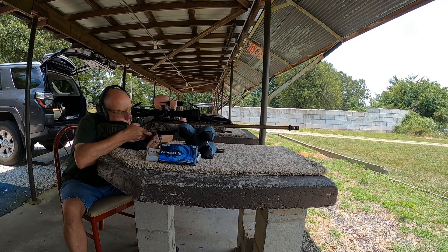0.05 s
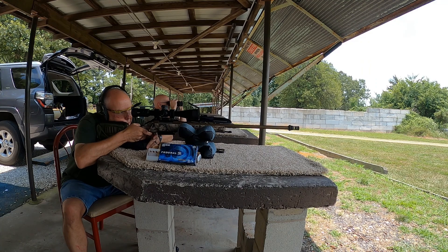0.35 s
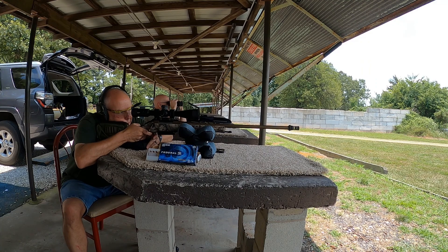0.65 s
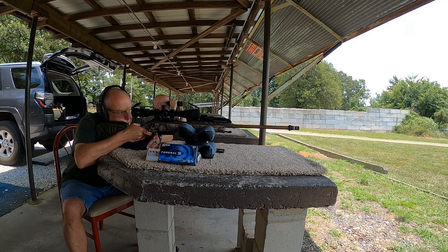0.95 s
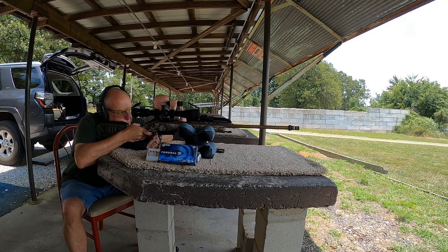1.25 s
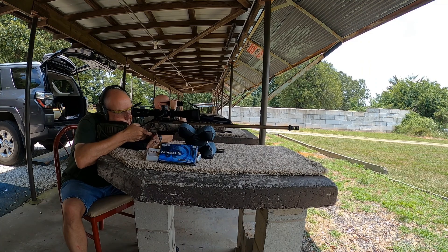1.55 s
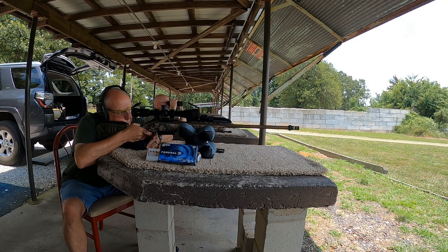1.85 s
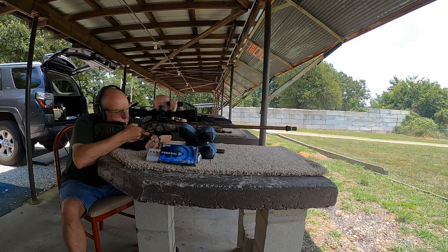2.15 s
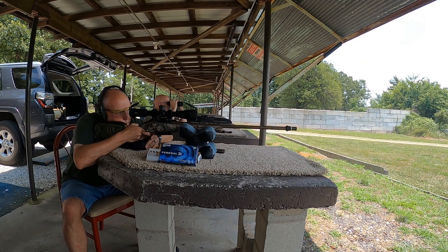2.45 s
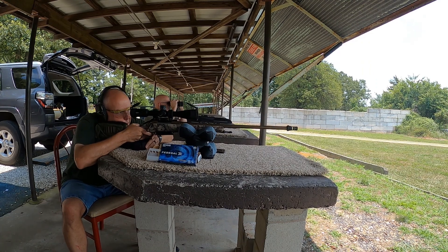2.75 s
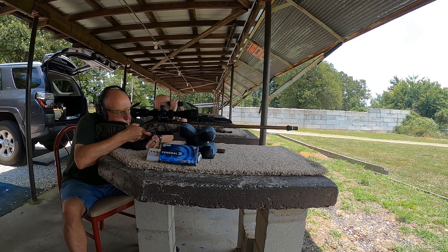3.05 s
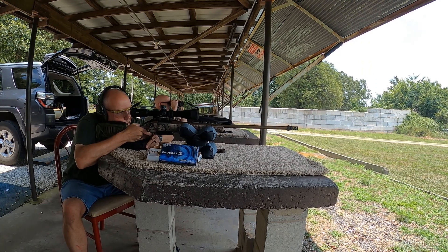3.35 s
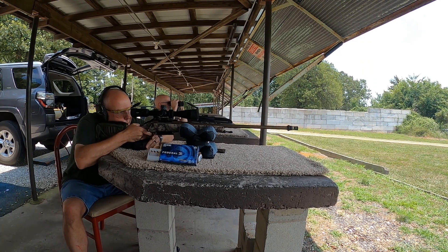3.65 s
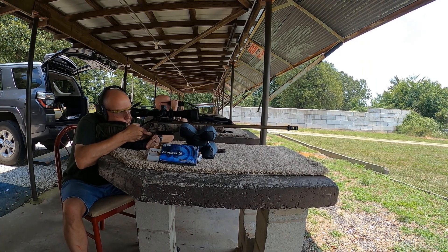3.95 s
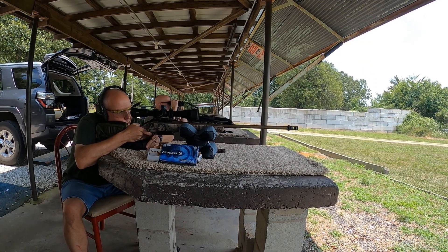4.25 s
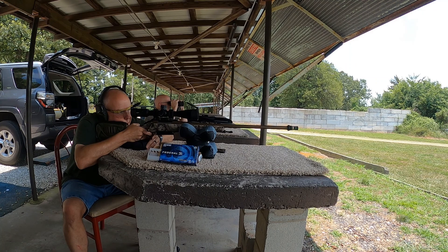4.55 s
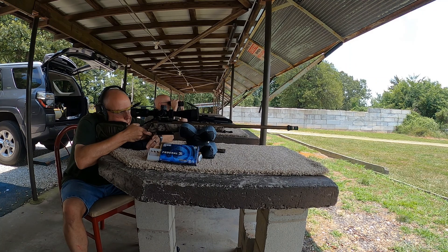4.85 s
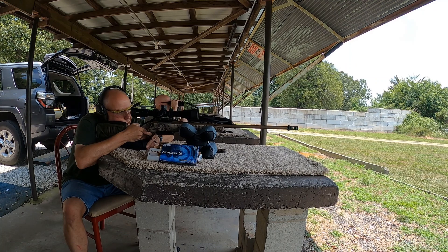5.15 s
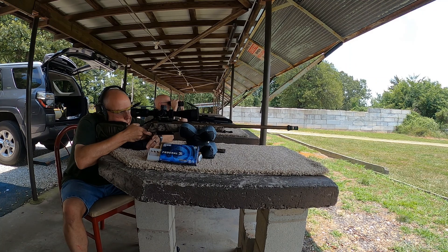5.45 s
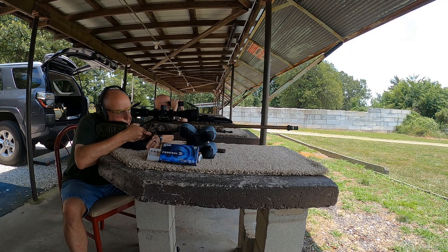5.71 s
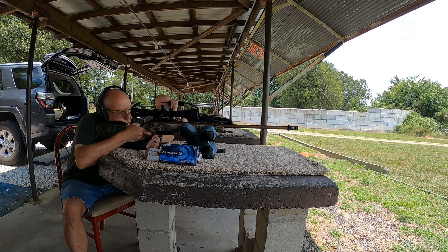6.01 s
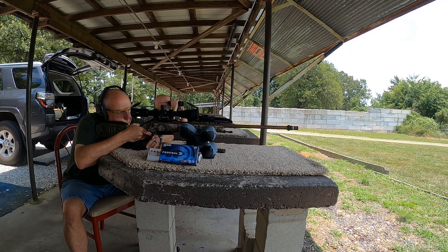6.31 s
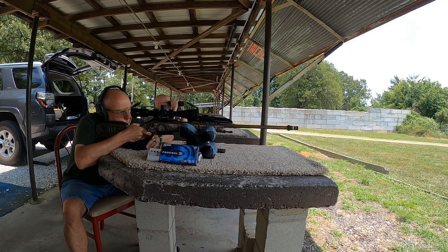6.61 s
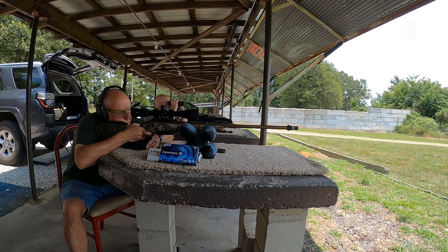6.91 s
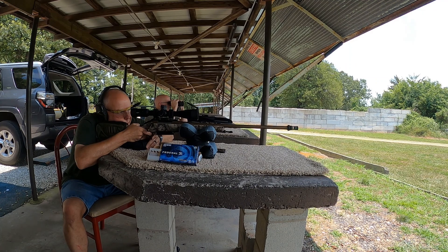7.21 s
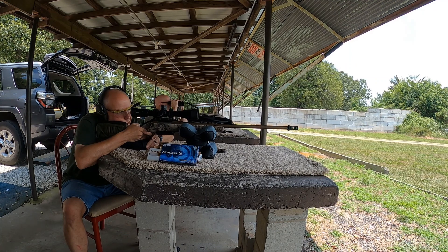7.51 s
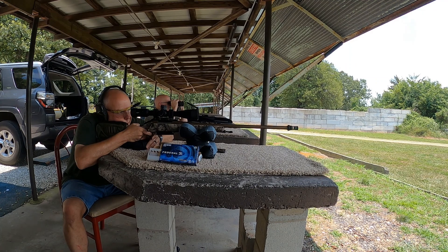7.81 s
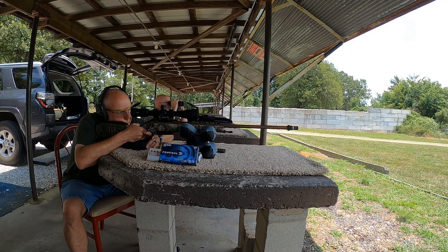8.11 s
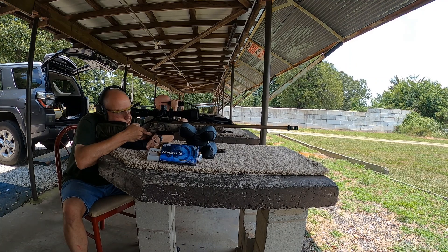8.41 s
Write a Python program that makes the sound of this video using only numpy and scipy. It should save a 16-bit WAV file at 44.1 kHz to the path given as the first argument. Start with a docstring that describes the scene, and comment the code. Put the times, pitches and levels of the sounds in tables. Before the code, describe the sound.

Rifle shots echo across a covered outdoor range, with one much louder, deeper shot close by that briefly muffles the rest.

```python
"""A covered outdoor rifle range, heard in mono from a camera microphone under the metal roof. Some lanes
away a rifle fires steadily: a dull thump, a bright rush scattered by the rafters, then a long roll from
the woods. Metal clicks at the benches, and a brief hollow growl swells into one shot at the nearest bench.
That shot overloads the camera, whose limiter ducks everything and takes about four seconds to recover.
Towards the end a light gust rumbles on the microphone."""
import sys
import numpy as np
from scipy import signal
from scipy.fft import rfft, irfft, next_fast_len
from scipy.io import wavfile

SR = 44100
rng = np.random.default_rng(int(sys.argv[2]) if len(sys.argv) > 2 else 0)


def transcribe(u):
    """Save the signal u as a 16-bit wav file named by the first command-line argument.

    u: samples, shape (n,) or (channels, n), limited to [-1, 1]; the rate is SR.
    q: integer samples, one column per channel.
    """
    v = np.clip(np.atleast_2d(u).T, -1, 1)
    q = np.round(v * 32767).astype(np.int16)
    wavfile.write(sys.argv[1], SR, q)


N = 377937

# Levels are relative, ahead of the limiter; spectra give the level per hertz.
# shots some lanes away: start_s, level_db, thump_db, steel_ring_db
LANE_SHOT_TIMES = [(-1.2, -3, 0, 0), (.019, 0, 1, -5), (1.275, .8, 0, 3), (3.501, -2.1, -1, 6.5),
                   (4.478, -.4, -2.5, 2), (5.640, -1, -2, -3), (6.805, .6, -.5, -4), (7.634, .2, -.5, -5)]
# muzzle wave to the microphone, direct, off the ground, off walls: delay_s, peak_db, low_hz, high_hz
MUZZLE_PATHS = [(.0002, -9, 520, 1100), (.002, -5.3, 340, 580), (.0885, -19, 300, 540),
                (.0915, -19, 300, 580), (.1345, -18.5, 140, 420), (.238, -28, 140, 450),
                (.599, -24, 700, 1400)]
# low modes of the shooting bay: pitch_hz, level_db, t60_s
BAY_MODES = [(335, -16, .12), (75, -38, .09)]
# high modes of the shelter's steel: pitch_hz, width_hz, level_db, t60_s
STEEL_MODES = [(4566, 7, -39.5, 1.35), (4640, 80, -42, 1.0), (7474, 4, -49.5, .8), (7540, 120, -57, .7)]
# scatter along the roof: frequency_hz, level_db
ROOF_SPECTRUM = [(29, -55), (50, -33), (138, -20), (179, -11), (237, -17), (293, -5.5), (492, -7),
                 (847, -.5), (1640, -9), (1840, -5), (2630, -9), (3250, -6), (7580, -25), (10600, -41),
                 (14000, -62)]
# scatter off nearby posts, whole shelter, rafters, far end of the roof: delay_s, level_db, rise_s, t60_s
ROOF_ECHOES = [(0, -26, .002, .15), (0, -26.5, .004, 3.5), (.022, -20, .065, 1.1), (.13, -21.2, .095, .22)]
# dull roll off ground and woods: frequency_hz, level_db
WOODS_SPECTRUM = [(40, -26), (75, -13), (110, -15), (170, -6.5), (240, -16), (400, -8), (520, 1), (640, -1),
                  (800, 1), (1050, -1), (1400, -12), (2300, -16), (4500, -30), (12000, -75)]
# roll from open ground, side berm, tree line, far woods: delay_s, level_db, rise_s, t60_s
WOODS_ECHOES = [(.001, -31, .003, 5.4), (.035, -23.5, .04, .2), (.57, -38, .03, 3.5), (.75, -38, .38, 2.2)]

# open air, and the breeze on the microphone: frequency_hz, level_db
AIR_SPECTRUM = [(20, -6), (150, 0), (900, -6), (3000, -22), (6000, -40), (13000, -62)]
BREEZE_SPECTRUM = [(15, -15), (40, -2), (75, 0), (150, -10), (500, -40), (3000, -90)]
# metal handled at the benches: start_s, level_db, low_hz, high_hz, t60_s
BENCH_CLICKS = [(2.0897, -26, 1800, 8000, .008), (2.095, -18, 600, 6000, .007),
                (3.002, -37, 3000, 6500, .15), (3.26, -38, 3000, 6500, .15), (3.3795, -23, 2800, 5400, .07),
                (3.398, -25, 2300, 3600, .09), (6.691, -48, 4750, 4950, .09)]
# hollow resonances of the growl: pitch_hz, width_hz, level_db
GROWL_MODES = [(237, 14, 0), (700, 18, -3), (860, 50, -11)]
# rasp on the growl: frequency_hz, level_db
RASP_SPECTRUM = [(60, -16), (800, 0), (1600, -8), (5000, -16), (11000, -22), (15000, -40)]

# the near shot's crack, its boom and its return from far down the field: frequency_hz, level_db
CRACK_SPECTRUM = [(40, -34), (120, -16), (300, 0), (500, 3), (850, 3.5), (1150, 2), (1500, -4.5),
                  (2200, -3.5), (3200, -8), (4700, -11), (6500, -20), (10000, -32), (14000, -54)]
BOOM_SPECTRUM = [(40, -44), (100, -32), (130, -14), (146, 0), (175, -2), (225, -5), (265, -16), (305, -4.5),
                 (335, -4.5), (420, -16), (900, -19), (1600, -42), (4000, -100)]
FIELD_SPECTRUM = [(30, -12), (80, -9), (200, -3), (400, -5), (750, 0), (1400, -1), (2300, -3), (4500, -14),
                  (6400, -26), (12000, -62)]
# the crack under the roof, then back from the berms: delay_s, level_db, rise_s, t60_s
CRACK_ECHOES = [(.0006, -11.6, .001, .57), (.14, -35, .23, .85)]
# the blast, its return from the berms, a lingering rumble: delay_s, level_db, rise_s, t60_s
BOOM_ECHOES = [(.001, -16, .008, 1.0), (.24, -38.5, .18, .55), (.3, -61, .3, 5.5)]
# slow returns from the end of the field and the trees behind: delay_s, level_db, rise_s, t60_s
FIELD_ECHOES = [(.55, -52, .22, 3), (.82, -52.5, .3, 1.9)]
# the space under the roof, rung by the near shot: pitch_hz, level_db, t60_s
SHELTER_MODES = [(146, -9, .75), (196, -17, .6), (334, -17, .6), (388, -23, .6)]


def undb(db):
    """Decibels to gain."""
    return np.exp(np.asarray(db) * np.log(10) / 20)


def unit(x):
    """Scale to rms 1."""
    return x / x.std()


def add(out, start_s, x):
    """Mix x into out from start_s on."""
    start = int(round(start_s * SR))
    lo, hi = max(start, 0), min(start + len(x), len(out))
    out[lo:hi] += x[lo - start:max(hi, lo) - start]


def colour(x, spectrum):
    """Shape noise to a spectrum, at rms 1."""
    hz, db = np.transpose(spectrum)
    size = next_fast_len(len(x), True)
    bins_hz = np.maximum(np.fft.rfftfreq(size, 1 / SR), 1)
    gain = undb(np.interp(np.log(bins_hz), np.log(hz), db))
    return unit(irfft(rfft(x, size) * gain, size)[:len(x)])


def lowpass(x, hz, order):
    """Causal low-pass."""
    return signal.sosfilt(signal.butter(order, hz, fs=SR, output="sos"), x + 1e-18)


def band(x, low_hz, high_hz):
    """Causal band-pass, gentle below and steep above."""
    low_cut = signal.butter(2, low_hz, "high", fs=SR, output="sos")
    return lowpass(signal.sosfilt(low_cut, x), high_hz, order=5)


def fade(t60, size):
    """Exponential decay, 60 dB in t60 seconds."""
    return np.exp(-np.log(1000) * np.arange(size) / SR / t60)


def swell(size, start_s, rise_s, t60, hold_s=0):
    """Envelope with peak 1: a rounded rise, a hold, an exponential release."""
    t = np.arange(size) / SR - start_s
    release = np.clip((t - rise_s - hold_s) / t60, 0, 10)
    return np.sin(np.pi / 2 * np.clip(t / rise_s, 0, 1)) * np.exp(-np.log(1000) * release)


def ringing(modes, size):
    """Struck modes, each a dying sine."""
    t = np.arange(size) / SR
    return sum(undb(db) * np.sin(2 * np.pi * hz * t) * fade(t60, size) for hz, db, t60 in modes)


def thump(size, low_hz, high_hz):
    """A muzzle wave rounded by its path to the microphone, peak 1."""
    wave = band(signal.unit_impulse(size), low_hz, high_hz)
    return wave / np.abs(wave).max()


def reflections(size, clump_db, clump_hz):
    """Countless small echoes that arrive in clumps."""
    position = np.arange(size) / SR * clump_hz
    clumps = np.interp(position, np.arange(size), rng.standard_normal(size))
    return rng.standard_normal(size) * undb(clump_db * clumps)


def echoes(waves, size):
    """Envelope of overlapping waves of echoes; their powers add."""
    power = sum((undb(db) * swell(size, delay_s, rise_s, t60)) ** 2 for delay_s, db, rise_s, t60 in waves)
    return np.sqrt(power)


def wavering(hz, width_hz, size):
    """A tone widened by a wandering phase, peak 1."""
    drift = np.cumsum(rng.standard_normal(size)) * np.sqrt(2 * np.pi * width_hz / SR)
    return np.sin(2 * np.pi * hz * np.arange(size) / SR + drift)


def through_air(x, db_per_khz_s, neutral_s):
    """Air takes treble with distance: echoes are brighter before neutral_s and duller after it."""
    hz, t, spectra = signal.stft(x, SR, nperseg=512)
    loss_db = np.outer(hz / 1000, t - neutral_s) * db_per_khz_s
    return signal.istft(spectra * undb(-loss_db), SR)[1][:len(x)]


def lane_rifle(shared_power=.7, shadow_s=.03, shadow_hz=4600):
    """Some lanes away: every shot takes the same paths; moving air changes part of the fine scatter."""
    out, size = np.zeros(N), 2 * SR
    t = np.arange(size) / SR
    direct = lowpass(ringing(BAY_MODES, size), 1500, order=2)
    for delay_s, db, low_hz, high_hz in MUZZLE_PATHS:
        add(direct, delay_s, undb(db) * thump(SR // 10, low_hz, high_hz))
    rafters = reflections(size, clump_db=2.2, clump_hz=700)
    trees = reflections(size, clump_db=2.4, clump_hz=55)
    shared = np.sqrt(shared_power) * np.array([rafters, trees])
    rush, roll = echoes(ROOF_ECHOES, size), echoes(WOODS_ECHOES, size)
    # the steel gathers its ring while the wave runs along the roof
    steel = sum(undb(db) * wavering(hz, width_hz, size) * swell(size, start_s=.01, rise_s=.16, t60=t60)
                for hz, width_hz, db, t60 in STEEL_MODES)
    # the first echoes bend round posts and benches and arrive dull
    shadow = np.exp(-(t / shadow_s) ** 4)
    for start_s, db, thump_db, ring_db in LANE_SHOT_TIMES:
        near, far = shared + np.sqrt(1 - shared_power) * rng.standard_normal((2, size))
        roof = through_air(colour(near, ROOF_SPECTRUM), db_per_khz_s=3.7, neutral_s=.14) * rush
        roof = lowpass(roof * np.sqrt(shadow), shadow_hz, order=4) + roof * np.sqrt(1 - shadow)
        woods = colour(far, WOODS_SPECTRUM) * roll
        add(out, start_s, undb(db) * (undb(thump_db) * direct + undb(ring_db) * steel + roof + woods))
    return out


def air_and_breeze(air_db=-54, calm_db=-64, gust_db=-51.5):
    """Quiet open air all round, and a breeze that rumbles on the microphone with one late gust."""
    air = colour(rng.standard_normal(N), AIR_SPECTRUM)
    breeze = colour(reflections(N, clump_db=3, clump_hz=8), BREEZE_SPECTRUM)
    gust = swell(N, start_s=7.5, rise_s=.8, t60=6)
    return undb(air_db) * air + breeze * (undb(calm_db) + undb(gust_db) * gust)


def bench_clicks():
    """At the benches: short bright ticks of handled metal."""
    out, size = np.zeros(N), SR // 2
    for start_s, db, low_hz, high_hz, t60 in BENCH_CLICKS:
        decay = fade(t60, size)
        passband = signal.butter(3, [low_hz, high_hz], "band", fs=SR, output="sos")
        tick = signal.sosfilt(passband, rng.standard_normal(size) * decay + 1e-18)
        add(out, start_s, undb(db) * unit(tick) * decay.std())
    return out


def growl(gain_db=-6.8, rasp_db=-15):
    """Three hollow resonances swell with a rasp on top and die as the near shot arrives."""
    rasp = colour(rng.standard_normal(N), RASP_SPECTRUM)
    hollow = sum(undb(db) * wavering(hz, width_hz, N) for hz, width_hz, db in GROWL_MODES)
    envelope = swell(N, start_s=2.097, rise_s=.024, t60=.015, hold_s=.008)
    return (hollow + undb(rasp_db) * rasp) * undb(gain_db) * envelope


def near_rifle(start_s=2.1326, gain_db=30.5, shock_s=.00038, shock_hz=5000, bench_s=.00045, build_s=.12):
    """At the nearest bench: a shock wave, its crack in the rafters, the boom, the field's far return."""
    out, size = np.zeros(N), 4 * SR
    crack = colour(reflections(size, clump_db=2.2, clump_hz=350), CRACK_SPECTRUM)
    shot = through_air(crack, db_per_khz_s=1.6, neutral_s=.09) * echoes(CRACK_ECHOES, size)
    shot += colour(rng.standard_normal(size), BOOM_SPECTRUM) * echoes(BOOM_ECHOES, size)
    field = colour(reflections(size, clump_db=1.5, clump_hz=90), FIELD_SPECTRUM)
    shot += field * echoes(FIELD_ECHOES, size)
    shot += ringing(SHELTER_MODES, size) * (1 - fade(build_s, size))
    # an N-shaped pressure jump, at once repeated by the bench top and the gear on it
    t = np.arange(SR // 100) / SR
    shock = lowpass((1 - 2 * t / shock_s) * (t < shock_s), shock_hz, order=3)
    add(shot, 0, undb(6) * shock)
    add(shot, bench_s, undb(5) * shock)
    add(shot, 2 * bench_s, undb(5) * shock / 2)
    # the slower push of the gas follows, and later a dull slap off a wall
    push = thump(SR // 10, low_hz=330, high_hz=900)
    slap = band(thump(SR // 10, low_hz=160, high_hz=260), low_hz=150, high_hz=400)
    add(shot, .001, undb(-4) * push)
    add(shot, .141, undb(-10) * slap)
    add(out, start_s, undb(gain_db) * shot)
    return out


def scene():
    """Under the roof, both microphone ports hear the same sound."""
    mono = lane_rifle() + near_rifle() + growl() + bench_clicks() + air_and_breeze()
    return np.array([mono, mono])


def record(dry, ceiling_db=3.2, release_db_per_s=8.3, hiss_db=-100,
           low_cut_hz=42, soft_top_hz=13200, top_hz=14000):
    """The camera's limiter ducks at once and recovers slowly; the highest peaks still clip."""
    recovery_db = release_db_per_s * np.arange(N) / SR
    over_db = 20 * np.log10(np.maximum(np.abs(dry).max(axis=0) / undb(ceiling_db), 1))
    duck_db = np.maximum.accumulate(over_db + recovery_db) - recovery_db
    clipped = np.clip(dry * undb(-duck_db), -.82, .82)
    sound = lowpass(clipped, soft_top_hz, order=2) + undb(hiss_db) * rng.standard_normal(dry.shape)
    sound = signal.sosfilt(signal.butter(2, low_cut_hz, "high", fs=SR, output="sos"), sound)
    return signal.sosfilt(signal.ellip(10, .2, 90, top_hz, fs=SR, output="sos"), sound)


dry = scene()
out = record(dry)
transcribe(out)
```